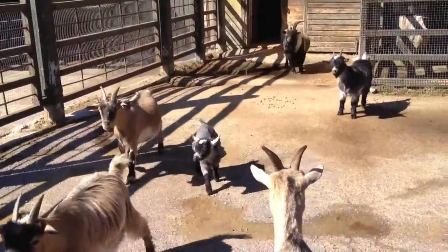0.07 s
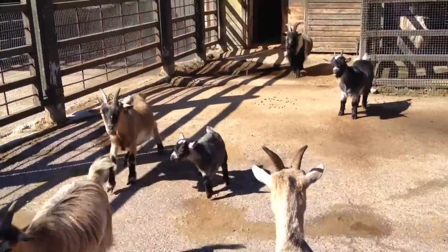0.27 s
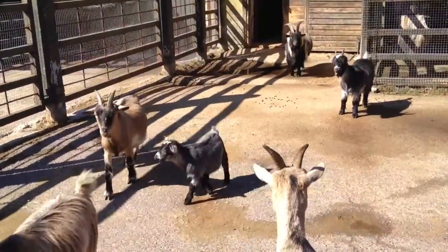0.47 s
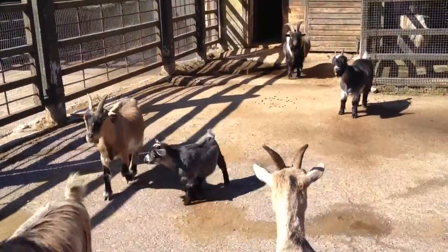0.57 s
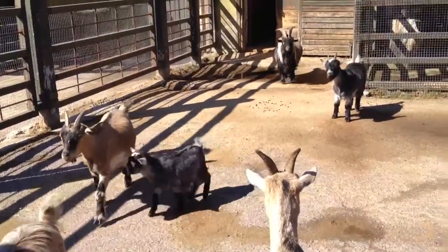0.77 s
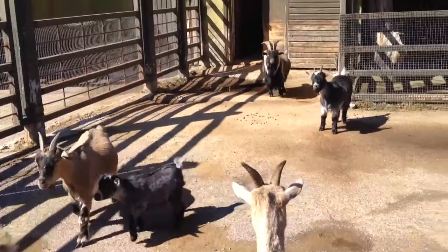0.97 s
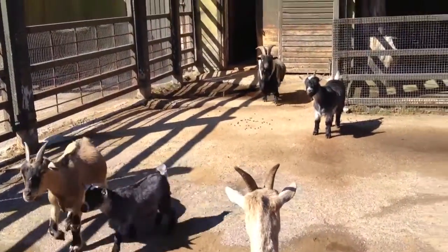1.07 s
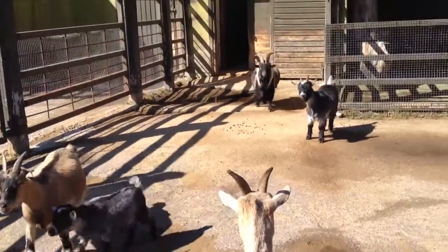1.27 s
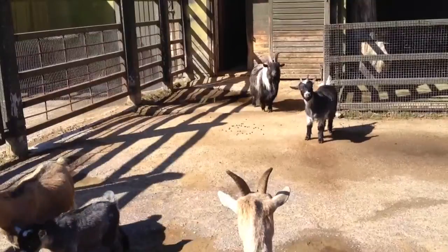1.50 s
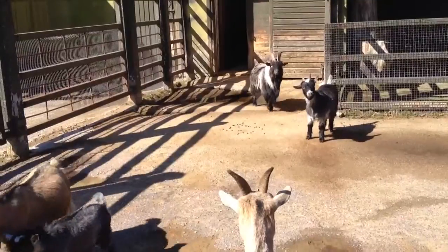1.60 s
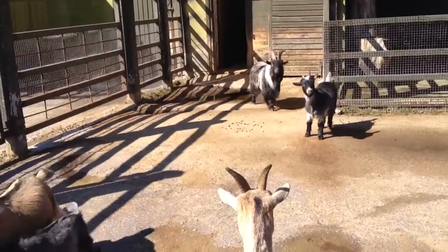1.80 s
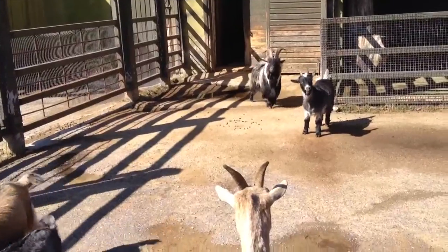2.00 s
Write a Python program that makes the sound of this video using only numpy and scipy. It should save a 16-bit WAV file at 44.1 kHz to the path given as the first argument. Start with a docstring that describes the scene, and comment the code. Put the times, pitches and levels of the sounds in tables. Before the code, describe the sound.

A goat bleats once, loud and close, in an outdoor pen with short echoes. The buzzy rising note starts around 0.2 seconds, turns raspy at 0.3, and flips at 0.6 into a high, sagging scream. It ends in a squeak near 1.2 and a brief low hum. Hooves scuff and knock on gritty concrete, mostly around 1.4. Gusts thump the microphone, mainly from 1.2 to 2 seconds, over faint hiss.

```python
"""A concrete pen outdoors, where a goat bleats once, close by. Its voice is a train of pulses coloured by
the throat: a buzzy rising note breaks into a rasp where two vibrations beat together, flips up to a
falling scream, and ends in a squeak and a low hum. Hooves scuff and knock on the gritty floor, and the
walls throw back short echoes. Gusts thump on the microphone over a faint hiss."""
import sys
import numpy as np
from scipy import signal
from scipy.fft import rfft, irfft, next_fast_len
from scipy.io import wavfile
from scipy.ndimage import uniform_filter1d

SR = 44100
rng = np.random.default_rng(int(sys.argv[2]) if len(sys.argv) > 2 else 0)


def unload_audio(sound):
    """Save the sound as a 16-bit wav file, at the path given as the first command line argument."""
    columns = np.transpose(np.atleast_2d(sound))
    # keep every value between -1 and 1, then stretch to whole-number steps
    steps = np.round(np.clip(columns, -1, 1) * 32767)
    wavfile.write(sys.argv[1], SR, steps.astype(np.int16))


N = 90404
T = np.arange(N) / SR


def from_db(db):
    """Decibels to gain."""
    return 10 ** (np.asarray(db) / 20)


def rms_one(x):
    """Scale to an rms of 1."""
    return x / np.sqrt(np.mean(x ** 2) + 1e-20)


def even(x):
    """Ride the level so that it holds an rms of 1."""
    return x / np.sqrt(np.maximum(uniform_filter1d(x ** 2, size=900), 0) + 1e-12)


def curves(rows):
    """One automation curve for each column after the time."""
    times, *columns = np.transpose(rows)
    return [np.interp(T, times, column) for column in columns]


def gate(rows, fade_s=.015):
    """Open from the first row's time to the last, with soft edges."""
    return np.clip(1 + np.minimum(T - rows[0][0], rows[-1][0] - T) / fade_s, 0, 1)


def drift(hz):
    """Smooth random modulation with an rms of 1."""
    pole = np.exp(-2 * np.pi * hz / SR)
    return rms_one(signal.lfilter([1], [1, -2 * pole, pole * pole], rng.standard_normal(N + SR))[SR:])


def colour(x, points):
    """Minimum-phase EQ through (frequency [Hz], gain [dB]) points, steep outside them."""
    size = 2 * next_fast_len(N)
    hz, db = np.transpose(points)
    octave = np.log2(np.maximum(np.arange(size // 2 + 1) * SR / size, 10))
    knots = np.log2(hz)
    octaves_outside = np.abs(octave - np.clip(octave, knots[0], knots[-1]))
    eq_db = np.interp(octave, knots, db) - np.minimum(24 * octaves_outside, 50)
    cepstrum = irfft(np.log(from_db(eq_db)))
    cepstrum[1:size // 2] *= 2
    cepstrum[size // 2 + 1:] = 0
    return irfft(rfft(x, size) * np.exp(rfft(cepstrum)))[:N]


def noise(points):
    """Coloured noise with an rms of 1."""
    return rms_one(colour(rng.standard_normal(N), points))


def band(x, low_hz, high_hz):
    """A steep band-pass."""
    return signal.sosfilt(signal.butter(6, [low_hz, high_hz], "band", fs=SR, output="sos"), x)


def sweep(x, hz, width_hz):
    """A swept resonance with unity gain at its centre."""
    carrier = np.exp(2j * np.pi * np.cumsum(hz) / SR)
    pole = np.exp(-np.pi * width_hz / SR)
    return 2 * np.real(carrier * signal.lfilter([1 - pole], [1, -pole], x / carrier))


def bumps(rows):
    """Each bump is a pressure swing of a cycle or two that swells and dies."""
    return sum(-from_db(db) * np.sin(2 * np.pi * hz * (T - s)) / np.cosh(np.clip((T - s) / ease, -20, 20))
               for s, db, hz, ease in rows)


def cycles(hz, waver):
    """Running cycle count of a vibration whose pitch wanders by the fraction waver."""
    return np.cumsum(hz * (1 + waver * drift(59.5))) / SR


def folds(turns, jitter, shimmer, breath, beat=0 * T, pull=0.0):
    """Vocal folds: a pulse and a puff of breath each cycle; a beat pulls on strength and timing."""
    count = np.arange(1, int(turns[-1]))
    timing_luck, strength_luck = rng.standard_normal((2000, 2))[:len(count)].T
    swing = np.interp(count, turns, beat)
    scatter = np.interp(count, turns, jitter + 0 * T) * timing_luck
    position = np.interp(count + scatter + pull * swing, turns, np.arange(N))
    strength = np.exp(shimmer * strength_luck) * (1 + swing)
    # windowed sincs place the pulses between samples
    taps = np.floor(position)[:, None] + np.arange(-7, 9)
    offset = taps - position[:, None]
    shapes = strength[:, None] * np.sinc(offset) * np.sinc(offset / 8)
    pulses = np.zeros(N)
    np.add.at(pulses, np.clip(taps, 0, N - 1).astype(int), shapes)
    puffs = rng.standard_normal(N) * (1 + np.cos(2 * np.pi * turns)) ** 2
    return rms_one(pulses - pulses.mean()) + breath * rms_one(puffs)


def throat(source, points, restless_db, restless_hz=14, trips_s=(.00047, .00083), feedback=.8):
    """Colour the pulses, let each ring on into the next, and let bands of overtones swell and fade."""
    size = next_fast_len(N + 4096)
    hz = np.arange(size // 2 + 1) * SR / size
    spectrum = rfft(colour(source, points), size)
    for trip in trips_s:
        delay = np.exp(-2j * np.pi * hz * trip)
        spectrum = spectrum * (feedback + delay) / (1 + feedback * delay)  # all-pass smear
    centres_hz = np.geomspace(1200, 9000, 16)
    bands = (irfft(spectrum * np.interp(hz, centres_hz, share), size)[:N] for share in np.eye(16))
    return sum(part * from_db(restless_db * drift(restless_hz)) for part in bands)


# EQ of the outdoor bed: (frequency [Hz], gain [dB])
HISS_EQ = [(290, 8.5), (500, 1), (935, 0), (1700, -5.5), (3200, -8), (6000, -11.5), (12300, -14.5),
           (15500, -20)]
def hiss():
    """A faint, steady bed of outdoor air."""
    return from_db(-58.5) * noise(HISS_EQ)


# swell of the gusts: (time [s], level [dB])
GUSTS = [(0, -57.5), (0.13, -57.5), (0.19, -57), (0.38, -68), (0.47, -55), (0.57, -56), (0.615, -24.5),
         (0.66, -56), (0.72, -48), (0.8, -54.5), (1.09, -64), (1.16, -32), (1.25, -46), (1.36, -38),
         (1.42, -44), (1.48, -56.5), (1.59, -48.5), (1.65, -45), (1.9, -45.5), (2.02, -61.5)]
# EQ of the rumble: (frequency [Hz], gain [dB])
RUMBLE_EQ = [(25, -35.5), (50, -24.5), (90, -7), (150, -2), (250, -2), (400, -10), (700, -31), (1500, -63),
             (4000, -104)]
# thumps on the microphone, plus two low swings that give body to the hoof knock near 1.316 s: (time [s],
# envelope top [dB], pitch [Hz], rise and decay [s])
WIND_THUMPS = [(0.030, -39, 204, 0.002), (0.272, -38.5, 164.3, 0.0019), (0.47, -47, 130, 0.004),
               (0.609, -21, 281, 0.0014), (0.614, -24, 151, 0.0062), (0.697, -32.5, 172, 0.0028),
               (1.163, -20, 228, 0.0032), (1.186, -23.5, 165.6, 0.0053), (1.275, -29, 169, 0.004),
               (1.3159, -17.5, 235, 0.0016), (1.3207, -25, 153, 0.0041), (1.3473, -31, 200, 0.0033),
               (1.379, -17.5, 199, 0.0022), (1.398, -18, 179, 0.0035), (1.560, -24, 182.5, 0.0019),
               (1.642, -28, 207, 0.002), (1.674, -31, 208, 0.0013), (1.693, -28.5, 202, 0.0017),
               (1.7452, -20, 212, 0.0017), (1.759, -31, 175, 0.0075), (1.802, -31.5, 158, 0.0036),
               (1.875, -39, 180, 0.01), (1.915, -31.5, 205, 0.0015), (1.97, -39, 156, 0.008),
               (2.045, -34, 185, 0.0043)]
def wind():
    """Gusts buffet the microphone with a lumpy rumble and single thumps; two low swings also add weight to a
    hoof knock."""
    db, = curves(GUSTS)
    rumble = rms_one(noise(RUMBLE_EQ) * from_db(4.3 * drift(15.3)))
    return from_db(db) * rumble + bumps(WIND_THUMPS)


# rising first note: (time [s], pitch [Hz], level [dB])
OPENING_NOTE = [(0.11, 301.5, -61), (0.147, 297.8, -44), (0.172, 311, -52), (0.196, 320.7, -37),
                (0.222, 326.3, -32), (0.236, 342, -32.5), (0.258, 336.8, -28.5), (0.285, 347.8, -29.5),
                (0.316, 369.2, -32.5), (0.323, 378, -43)]
# its throat formants: (frequency [Hz], gain [dB])
OPENING_EQ = [(330, 0.5), (520, 4), (680, -8), (1020, 12), (1350, 0), (1700, 8.5), (2050, -9), (2400, 8.5),
              (2700, 3.5), (3100, 11), (3700, 10.5), (4100, 7), (4750, 10), (5200, -2), (5650, 5.5),
              (6400, -8.5), (7400, -7.5), (8300, -15), (12000, -25)]
def opening():
    """A buzzy note that starts muffled, lips nearly shut, and rises as the mouth opens."""
    hz, db = curves(OPENING_NOTE)
    source = folds(cycles(hz, waver=.003), jitter=.003, shimmer=.09, breath=.14)
    lips_parting = np.exp(-.5 * ((T - .19) / .015) ** 2)
    muffled = from_db(-44.5) * lips_parting * even(band(source, 277, 640))
    buzz = even(throat(source, OPENING_EQ, restless_db=2.5))
    return from_db(db) * gate(OPENING_NOTE) * buzz + muffled


# scuffs on grit: (time [s], level [dB], half-length [s])
HOOF_SCUFFS = [(0.162, -42, 0.001), (0.994, -49.5, 0.018), (1.058, -46.5, 0.0082), (1.131, -48, 0.0054),
               (1.205, -53, 0.00099), (1.266, -58.5, 0.028), (1.324, -58.5, 0.023), (1.416, -50, 0.0061),
               (1.429, -55, 0.0045), (1.551, -59, .004), (1.65, -51.5, 0.037), (1.826, -56, 0.0074),
               (1.986, -58.5, 0.05)]
# EQ of the crunch: (frequency [Hz], gain [dB])
GRIT_EQ = [(300, -11), (700, -0.5), (1300, -8), (2100, -8), (3200, -8), (5500, -8), (8000, -7.5),
           (12000, -13.5), (15500, -14)]
# one slide over the grit: (time [s], band centre [Hz], level [dB])
HOOF_SLIDE = [(1.25, 4280, -70), (1.305, 4710, -64), (1.325, 7400, -59), (1.34, 9500, -49.5),
              (1.355, 8000, -55)]
# grains snapping underfoot: (time [s], level [dB])
GRAIN_SNAPS = [(1.366, -46.5), (1.4055, -43), (1.408, -44.5), (1.411, -40), (1.4151, -37), (1.4172, -36.5),
               (1.424, -54)]
# EQ of the snaps: (frequency [Hz], gain [dB])
SNAP_EQ = [(900, 4), (2100, -2), (3500, -10), (6000, 2), (7200, -8), (8600, -1), (11000, -10), (15500, -6)]
# knocks on concrete: (time [s], envelope top [dB], pitch [Hz], rise and decay [s])
HOOF_KNOCKS = [(1.3157, -17.5, 487, 0.00077), (1.343, -30, 422, 0.0044), (1.3935, -31, 580, 0.00074),
               (1.415, -29.5, 756, 0.0011)]
def hooves(grains_per_s=2200, grain_share=.56, snap_decay_s=.0021):
    """Grit crunches and snaps under shuffling hooves, which also slide and knock on the concrete."""
    pressure = sum(from_db(db) * np.exp(-.5 * ((T - s) / half) ** 2) for s, db, half in HOOF_SCUFFS)
    grains = (rng.random(N) < grains_per_s / SR) * rng.standard_normal(N)
    grit = rms_one((1 - grain_share) * noise(GRIT_EQ) + grain_share * rms_one(colour(grains, GRIT_EQ)))
    spikes = sum(from_db(db) * (T >= s) * np.exp(-np.abs(T - s) / snap_decay_s) for s, db in GRAIN_SNAPS)
    snaps = spikes * noise(SNAP_EQ)
    hz, db = curves(HOOF_SLIDE)
    slide = from_db(db) * gate(HOOF_SLIDE) * rms_one(sweep(grit, hz, width_hz=1700))
    return pressure * grit + snaps + slide + bumps(HOOF_KNOCKS)


# stray tones in the voice: (centre time [s], half-length [s], pitch [Hz], glide [Hz/s], level [dB])
VOICE_CRACKS = [(0.314, 0.010, 1107, 614, -33), (0.33, 0.016, 530, -1300, -45.5),
                (0.334, 0.022, 258.7, -1000, -41.5), (0.473, 0.011, 703, 3202.5, -34.5),
                (0.495, 0.016, 1950, -4000, -40), (0.525, .016, 1122, 3206, -36.5),
                (0.546, 0.012, 2006, 5002, -39), (0.559, 0.01175, 729, 284, -35.5),
                (0.578, 0.014, 2250, 1978, -48), (0.735, 0.04, 590, -600, -47.5)]
def cracks():
    """Short, wobbly chirps where the voice changes register; the faster the glide, the rougher."""
    chirps = np.zeros(N)
    for s, half, hz, glide, db in VOICE_CRACKS:
        pitch = hz + glide * np.clip(T - s, -3 * half, 3 * half)
        turns = cycles(pitch, waver=(10 + .01 * abs(glide)) / hz)
        envelope = from_db(db) * np.exp(-.5 * ((T - s) / half) ** 2)
        chirps += envelope * np.sqrt(2) * np.sin(2 * np.pi * turns)
    return chirps


# broken note: (time [s], pitch [Hz], level [dB], second vibration [Hz], pulse scatter [cycles])
RASP_NOTE = [(0.333, 444.4, -28.5, 389.6, 0.048), (0.36, 447.6, -31.5, 360.5, 0.0064),
             (0.44, 456.9, -30.5, 364.7, 0.0084), (0.475, 466.2, -30.5, 350.1, .016),
             (0.51, 459.8, -31, 350.9, 0.037), (0.55, 473, -30.5, 350.4, 0.059),
             (0.585, 454, -36, 348, 0.07), (0.63, 458, -51, 343, 0.15)]
# its throat formants: (frequency [Hz], gain [dB])
RASP_EQ = [(340, -6.5), (455, -3.5), (560, -12), (760, -15), (920, 1.5), (1350, 1), (1750, -1.5),
           (2150, -12.5), (2600, 0), (3100, 0.5), (3550, -1.5), (3830, 0), (4250, -4), (4620, 0.5),
           (5200, -13), (5650, -2), (6300, -14.5), (7400, -13.5), (8700, -22), (9500, -31), (10400, -25),
           (12000, -39)]
def rasp():
    """Two vibrations of the throat clash; the more the pulses scatter, the more breath and wobble."""
    hz, db, beat_hz, scatter = curves(RASP_NOTE)
    beat = .22 * np.sin(2 * np.pi * cycles(beat_hz, waver=.002 + .2 * scatter))
    turns = cycles(hz, waver=.003)
    source = folds(turns, jitter=scatter, shimmer=.14, breath=.1 + scatter, beat=beat, pull=.5)
    return from_db(db) * gate(RASP_NOTE) * even(throat(source, RASP_EQ, restless_db=2.2))


# low layer of the voice: (time [s], pitch [Hz], level [dB])
HUM_NOTE = [(0.42, 290, -67), (0.47, 297, -43.5), (0.57, 288.4, -47.5), (0.64, 285, -53),
            (0.70, 305.4, -44), (0.78, 292.3, -45.5), (0.88, 287.5, -82), (0.99, 269.8, -41.5),
            (1.09, 284.5, -63.5), (1.135, 307.4, -40), (1.21, 301.1, -36), (1.30, 297.2, -41.5),
            (1.44, 268.3, -43), (1.50, 254, -60)]
# its dark throat tone: (frequency [Hz], gain [dB])
HUM_EQ = [(150, 4), (290, 10), (450, -3), (600, -11.5), (900, -15.5), (1400, -27), (1800, -28),
          (2600, -27.5), (4500, -25.5), (9000, -52)]
def hum():
    """A breathy, muffled hum under the voice, left alone as the mouth closes."""
    hz, db = curves(HUM_NOTE)
    source = folds(cycles(hz, waver=.0072), jitter=.014, shimmer=.089, breath=.32)
    return from_db(db) * gate(HUM_NOTE) * even(colour(source, HUM_EQ))


# high note: (time [s], pitch [Hz], fundamental [dB], mids before trim [dB], treble before trim [dB])
SCREAM_NOTE = [(0.585, 733.0, -37, -32.5, -38.5), (0.598, 772, -26, -33.5, -40),
               (0.62, 798.8, -24, -31.5, -38.5), (0.65, 800.4, -28, -32.5, -40.5),
               (0.684, 784, -24.5, -30, -40.5), (0.702, 757.8, -28.5, -32, -38.5),
               (0.776, 755.5, -27, -32.5, -37.5), (0.826, 770.8, -27, -34, -39.5),
               (0.9, 746, -32, -36.5, -43.5), (0.965, 726, -40.5, -43.5, -44), (1.03, 685, -41, -43.5, -49),
               (1.07, 657.5, -40.5, -44, -41.5), (1.135, 610, -51.5, -48, -52.5)]
# second vibration of the throat: (time [s], rate [Hz], depth [0-1], hoarse air [dB])
SCREAM_ROUGHNESS = [(0.58, 205.7, 0.13, -35), (0.645, 200.9, 0.02, -39), (0.675, 214.5, 0.03, -46.5),
                    (0.72, 235.6, 0.19, -36), (0.76, 261.3, 0.29, -47), (0.81, 264.6, 0.18, -36),
                    (0.86, 285.8, 0.11, -41), (0.915, 293.6, 0.25, -44.5), (0.945, 300, 0, -53),
                    (1.12, 326.6, 0.01, -68)]
# throat formants of the scream: (frequency [Hz], gain [dB])
SCREAM_EQ = [(1030, -11), (1250, -7), (1550, -3.5), (2000, 5), (2260, -9.5), (2430, -18.5), (2680, -6),
             (3150, -8.5), (3450, -3), (3800, -2.5), (4050, -12), (4650, -7.5), (5180, -27.5), (5600, -10),
             (6050, -23.5), (6400, -10), (7050, -26.5), (7550, -19), (9000, -33), (12000, -34.5)]
# EQ of the hoarse air: (frequency [Hz], gain [dB])
HOARSE_EQ = [(800, -11), (900, 4), (1050, 1), (1130, 2), (1200, -3), (1290, -12)]
def scream(mid_trim_db=-2.5, treble_trim_db=-3.0):
    """A high note that sags, roughened by the second vibration's side tones and a rattle of air."""
    hz, base_db, mid_db, treble_db = curves(SCREAM_NOTE)
    beat_hz, depth, hoarse_db = curves(SCREAM_ROUGHNESS)
    turns = cycles(hz, waver=.004)
    beat = depth * np.sin(2 * np.pi * cycles(beat_hz, waver=.04))
    source = folds(turns, jitter=.0055 + .026 * depth, shimmer=.12, breath=.15, beat=beat, pull=.12)
    voice = throat(source, SCREAM_EQ, restless_db=3.6)
    fundamental = np.sqrt(2) * np.sin(2 * np.pi * turns)
    side_tones = from_db(11) * band(beat * fundamental, 623, 1310)
    body = from_db(base_db) * (fundamental + side_tones)
    mids = from_db(mid_db + mid_trim_db) * even(band(voice, 830, 3770))
    treble = from_db(treble_db + treble_trim_db) * even(band(voice, 3940, 13400))
    hoarse = from_db(hoarse_db) * even(band(noise(HOARSE_EQ), 826, 1260))
    flicker = from_db(.94 * drift(13))
    return gate(SCREAM_NOTE) * (body + hoarse + (mids + treble) * flicker)


# closing yelp: (time [s], pitch [Hz], level [dB])
SQUEAK_NOTE = [(1.115, 624, -44.5), (1.145, 586, -36.5), (1.161, 485.4, -29.5), (1.176, 511, -41),
               (1.19, 570, -57), (1.215, 541, -79)]
# its throat formants: (frequency [Hz], gain [dB])
SQUEAK_EQ = [(500, -18), (750, 8), (1000, 8), (1200, 4), (1450, -22), (1780, 7.5), (2300, -25.5),
             (4500, -14), (7000, -26.5), (12000, -44)]
def squeak():
    """The scream collapses in a quick downward yelp."""
    hz, db = curves(SQUEAK_NOTE)
    source = folds(cycles(hz, waver=.008), jitter=.006, shimmer=.12, breath=.1)
    return from_db(db) * gate(SQUEAK_NOTE) * even(colour(source, SQUEAK_EQ))


# sharp resonance of the mouth: (time [s], centre [Hz], boost or cut [dB])
MOUTH_SWEEP = [(0.2, 3830, 5), (0.235, 4150, 8), (0.255, 4500, -14), (0.282, 3470, -7), (0.32, 3840, -7),
               (0.37, 4050, 9), (0.41, 3900, 10.5), (0.45, 3620, 7), (0.49, 3070, -1), (0.535, 3450, 6),
               (0.58, 3360, -4), (0.66, 3070, 3), (0.75, 4600, -1), (0.84, 4580, 4), (0.9, 4500, 5.5),
               (1.07, 4550, -0.5)]
def mouth(voice):
    """Tongue and jaw sweep a narrow peak or notch through the whole voice."""
    hz, gain_db = curves(MOUTH_SWEEP)
    return voice + (from_db(gain_db) - 1) * sweep(voice, hz, width_hz=156)


# early reflections off the concrete: (delay [s], level [dB])
REFLECTIONS = [(.0057, -15), (0.015, -22), (0.031, -14)]
def pen(x, t60_s=.49, build_s=.084, tail_db=-17):
    """Ground and walls add quick echoes and a thin reverb tail."""
    echoes = sum(from_db(db) * np.interp(T - s, T, x, left=0) for s, db in REFLECTIONS)
    tail = rng.standard_normal(N) * from_db(-60 * T / t60_s) * np.minimum(T / build_s, 1)
    wash = from_db(tail_db) * signal.fftconvolve(x, tail / np.sqrt(np.sum(tail ** 2)))[:N]
    return x + signal.sosfilt(signal.butter(1, 22000, fs=SR, output="sos"), echoes + wash)


def scene():
    """Mono mix: goat and hooves ring in the pen, wind and hiss stay dry."""
    goat = mouth(opening() + rasp() + scream() + squeak() + hum() + cracks())
    return (pen(goat + hooves()) + wind() + hiss())[None]


def record(dry, low_cut_hz=58, high_cut_hz=15600):
    """The microphone sheds the deep bass; the top is cut steeply."""
    thinned = signal.sosfilt(signal.butter(2, low_cut_hz, "high", fs=SR, output="sos"), dry)
    return signal.sosfilt(signal.ellip(10, .1, 80, high_cut_hz, fs=SR, output="sos"), thinned)


dry = scene()
out = record(dry)
unload_audio(out)
```